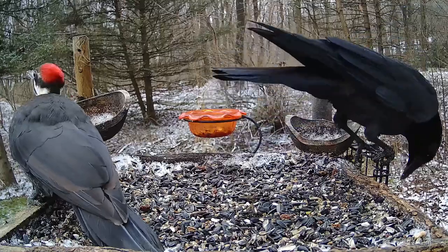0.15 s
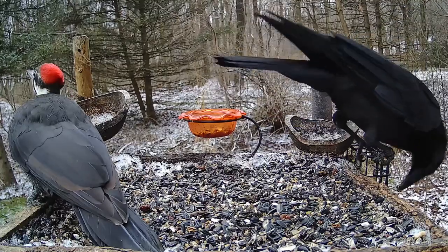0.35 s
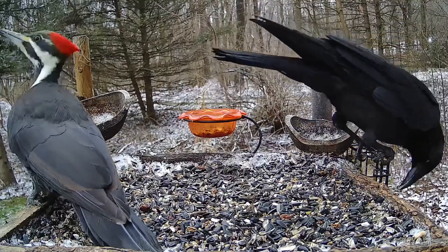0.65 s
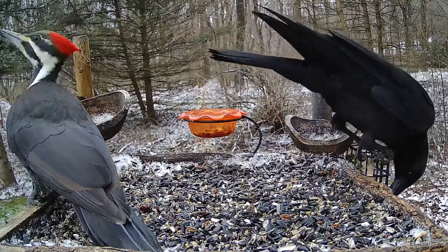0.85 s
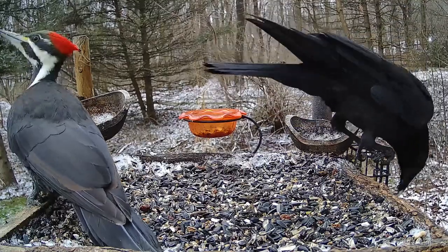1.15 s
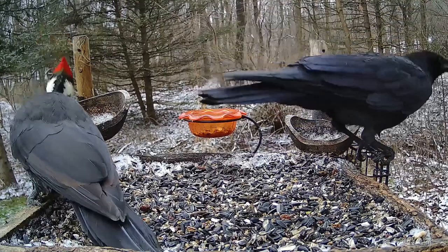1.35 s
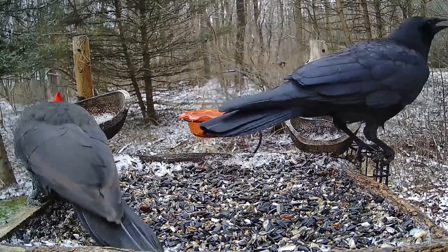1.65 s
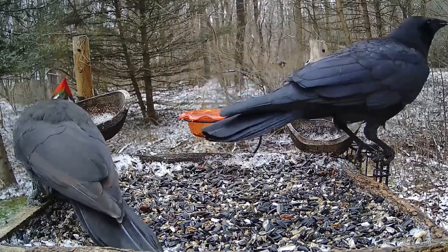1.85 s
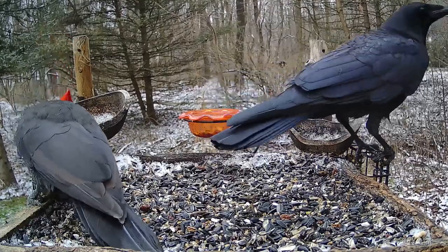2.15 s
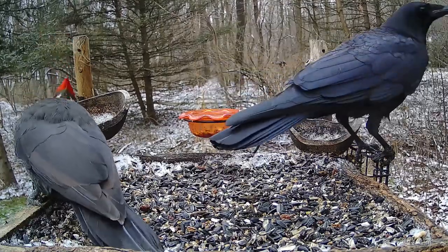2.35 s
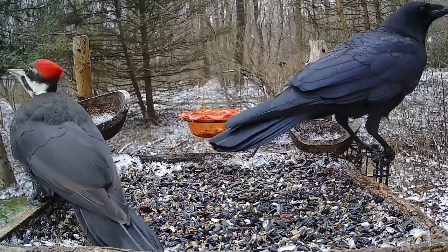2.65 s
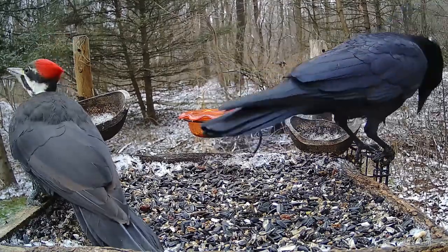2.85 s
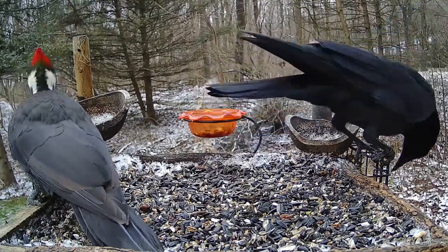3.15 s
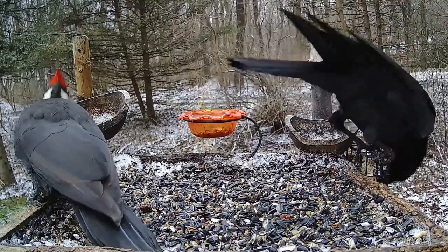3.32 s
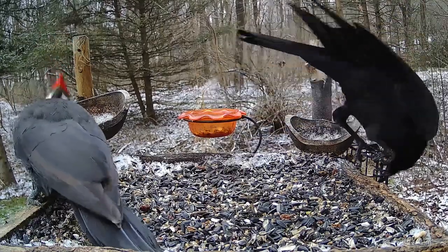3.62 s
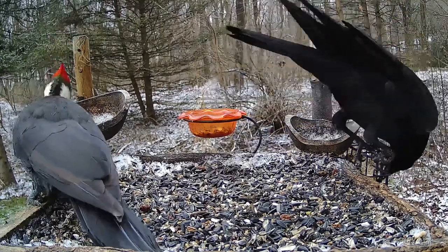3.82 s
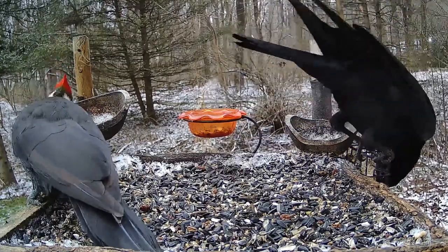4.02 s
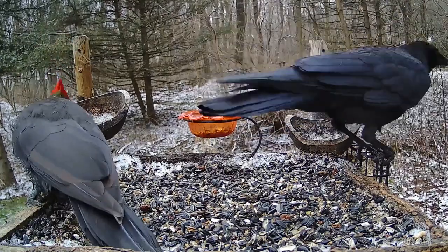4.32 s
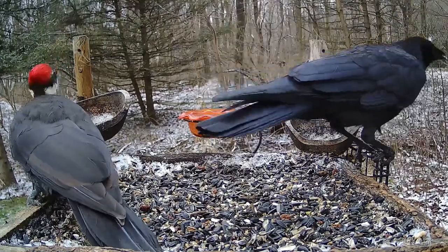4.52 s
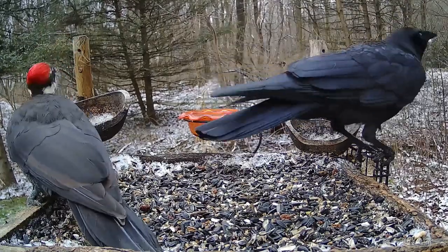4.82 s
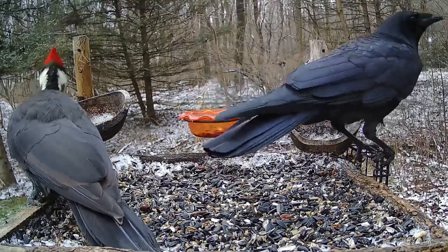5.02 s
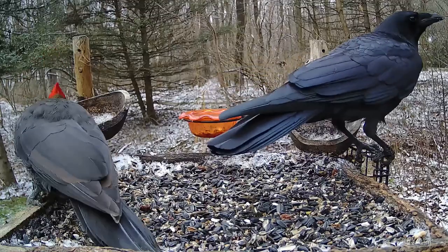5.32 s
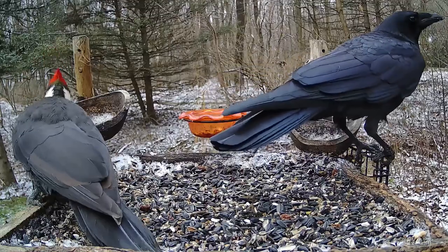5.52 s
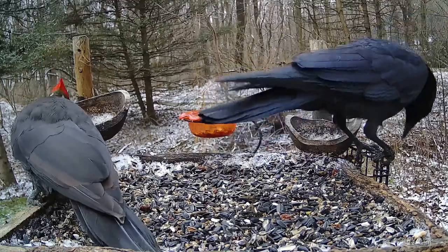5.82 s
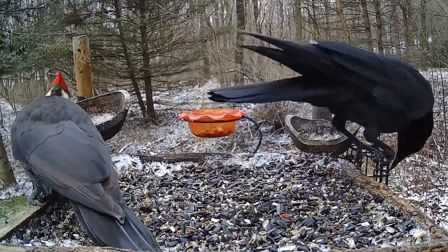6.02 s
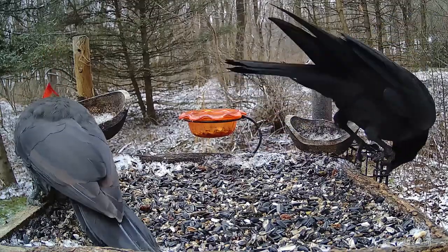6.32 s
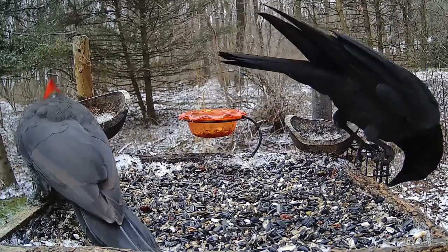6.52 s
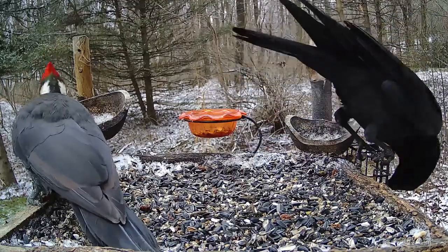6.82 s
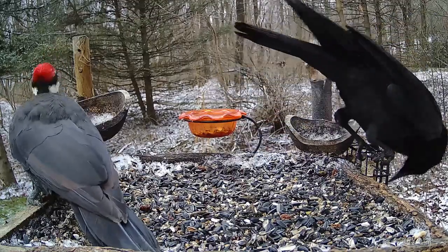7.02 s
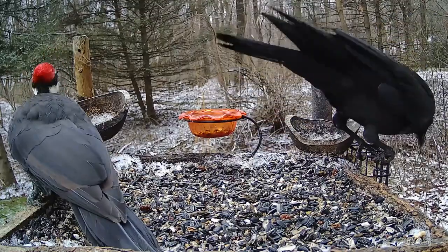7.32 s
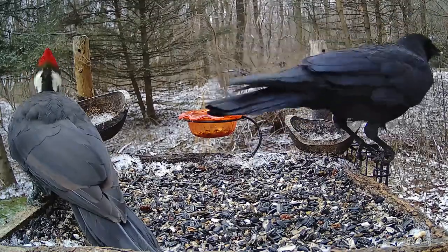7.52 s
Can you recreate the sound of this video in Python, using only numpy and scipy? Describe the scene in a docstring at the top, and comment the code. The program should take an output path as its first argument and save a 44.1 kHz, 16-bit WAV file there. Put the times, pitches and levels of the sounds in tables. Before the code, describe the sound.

A crow pecks at seed on a wooden feeder tray close to the microphone. Each peck gives a short crunch and a hollow thump, and harder ones rattle the feeder in quick clusters of dry clacks, with the tick of a splitting husk. The busiest cluster comes near the middle, then the pecks thin out. Behind are quiet winter woods, a soft low rush of air, faint high chirps and slight hiss.

```python
"""Quiet winter woods, the camera's microphone close to a wooden feeder tray where a crow pecks at seed.
Each peck stirs the seed and thumps the tray; hard ones set the feeder rattling in quick clusters of
clacks, jolt loose seeds and now and then split a husk. The trees return a faint echo.
Behind it: a soft outdoor rush, faint high bird calls far off and the camera's own hiss."""
import sys
import numpy as np
from scipy import signal
from scipy.fft import rfft, irfft, next_fast_len
from scipy.io import wavfile
from scipy.ndimage import map_coordinates

SR = 44100
rng = np.random.default_rng(int(sys.argv[2]) if len(sys.argv) > 2 else 0)


def store_pcm(level_fs):
    """Save levels as 16-bit WAV."""
    pcm = np.round(np.clip(level_fs, -1, 1) * 32767).astype(np.int16)
    wavfile.write(sys.argv[1], SR, np.atleast_2d(pcm).T)


N = 337806


def amp(db):
    """Decibels to gain."""
    return 10 ** (np.asarray(db) / 20)


def unit(x):
    """Scale to rms 1."""
    return x / np.sqrt(np.mean(x ** 2) + 1e-20)


def along(points, hz):
    """Read (f/Hz, value) points on a log frequency axis."""
    f, values = np.transpose(points)
    return np.interp(np.log(hz + 1), np.log(f + 1), values)


def add(track, s, sound):
    """Mix a sound into the track at s seconds."""
    part = track[max(round(s * SR), 0):][:len(sound)]
    part += sound[:len(part)]


def noise(spectrum, size):
    """Coloured noise of rms 1."""
    m = next_fast_len(size)
    colour = amp(along(spectrum, np.fft.rfftfreq(m, 1 / SR)))
    return unit(irfft(rfft(rng.standard_normal(m)) * colour, m)[:size])


def wobble(rate, size):
    """A smooth random curve, rate knots a second."""
    knots = rng.standard_normal(int(size * rate / SR) + 4)
    return map_coordinates(knots, [np.arange(size) * rate / SR])


def rise(t, tau):
    """Onset with a time constant of tau seconds."""
    return 1 - np.exp(-t / tau)


def fade(t, t60):
    """Exponential decay by 60 dB in t60 seconds."""
    return np.exp(-np.log(1000) * t / t60)


def ring(modes, t, scatter_db, detune, tilt_db=0):
    """Damped modes, a little different at every blow; the tilt is in dB per octave about their middle."""
    hz, db, t60 = np.transpose(modes)
    chance = rng.standard_normal((2, len(hz)))
    gain = amp(db + scatter_db * chance[0] + tilt_db * np.log2(hz / np.median(hz)))
    gain *= (-1) ** np.arange(len(hz))  # neighbouring modes swing in opposite senses
    pitch = hz * (1 + detune * chance[1])
    return gain @ (np.sin(2 * np.pi * np.outer(pitch, t)) * fade(t, t60[:, None]))


# Open air all around the microphone: f/Hz, relative density/dB
AIR_SPECTRUM = [(12, -48.5), (20, 6.5), (43, -5), (92, -11.5), (191, -21.5), (280, -18), (327, -23.5),
                (367, -21.5), (462, -20), (572, -17.5), (809, -33.5), (999, -34), (1440, -28), (1620, -42),
                (2000, -50.5), (2600, -109), (4400, -120)]
def outdoor_rush():
    """A low, almost steady rush of air."""
    return amp(-52.5 + 0.18 * wobble(2.42, N)) * noise(AIR_SPECTRUM, N)


# Hiss in the camera itself: f/Hz, relative density/dB
HISS_SPECTRUM = [(1120, 0.5), (1900, 0.5), (3280, -3.5), (5310, -4), (5600, -4), (7030, -3), (10300, -2),
                 (11400, -3), (12100, -2.5), (14400, -3.5), (15500, -9)]
# Its whine: f/Hz, rms level/dB
WHINE_TONES = [(9000, -96), (12000, -89)]
def camera_noise():
    """The electronics add a steady hiss and a thin whine."""
    t = np.arange(N) / SR
    whine = sum(amp(db) * np.sqrt(2) * np.sin(2 * np.pi * hz * t) for hz, db in WHINE_TONES)
    return amp(-71.5) * noise(HISS_SPECTRUM, N) + whine


def bird_whistle(s, length, db, hz, spacing_hz, sag_hz_per_s):
    """One thin, slowly falling call far off, three wavering partials wide."""
    out, t = np.zeros(N), np.arange(SR // 2) / SR
    swell = np.sin(np.pi * np.minimum(t / length, 1))
    for k in range(3):
        pitch = hz + k * spacing_hz - sag_hz_per_s * t + 35 * wobble(200, len(t))
        add(out, s, amp(db) * swell * np.sin(2 * np.pi * np.cumsum(pitch) / SR))
    return out


# A small bird far off in the woods: t/s
CHIRP_TIMES = [0.715, 1.98, 2.12, 2.652, 3.994, 4.42, 6.742, 7.523]
def bird_chirps(db, hz, spread_hz, width_s):
    """Tiny high notes, each bent a little differently."""
    out, t = np.zeros(N), np.arange(-SR // 40, SR // 40) / SR
    swell = np.exp(-(t / width_s) ** 2)
    for s in CHIRP_TIMES:
        pitch = hz + spread_hz * wobble(205, len(t))
        add(out, s + t[0], amp(db) * swell * np.sin(2 * np.pi * np.cumsum(pitch) / SR))
    return out


# Echo among the trees around the feeder: f/Hz, t60/s
ECHO_DECAY = [(200, 1), (1500, 0.64), (3500, 0.27), (10000, 0.77)]
def tree_echo(x):
    """The trees scatter back a diffuse tail."""
    hz, t, bands = signal.stft(rng.standard_normal(SR // 2), SR, nperseg=256)
    bands *= fade(t, along(ECHO_DECAY, hz)[:, None])
    _, tail = signal.istft(bands, SR, nperseg=256)
    return signal.fftconvolve(x, tail / np.linalg.norm(tail))[:N]


def feeder_sway(s, db, hz, t60):
    """The feeder rocks once, very low, as the bird straightens up."""
    out, t = np.zeros(N), np.arange(SR // 3) / SR
    add(out, s, amp(db) * np.sin(2 * np.pi * hz * t) * rise(t, 0.011) * fade(t, t60))
    return out


# Husks splitting near the microphone: t/s, level/dB
HUSK_SPLITS = [(1.321, -39), (3.276, -40), (3.2882, -30), (3.316, -35.5), (3.522, -41), (3.536, -41),
               (4.774, -39), (6.3725, -40), (6.69, -41.5)]
# One snap: f/Hz, relative density/dB
SNAP_SPECTRUM = [(3000, -8), (5500, -2), (8000, -4), (10500, -8), (15000, -13)]
def husk_snaps():
    """Splitting husks tick high above the wooden sounds."""
    out, t = np.zeros(N), np.arange(SR // 20) / SR
    for s, db in HUSK_SPLITS:
        add(out, s, amp(db) * noise(SNAP_SPECTRUM, len(t)) * rise(t, 0.0017) * fade(t, 0.0095))
    return out


# Taps on bare parts of the feeder, close up: t/s, level/dB, f/Hz
BARE_TAPS = [(0.055, -37.5, 1040), (0.066, -45.5, 3320), (0.384, -41, 1113), (0.721, -29, 171),
             (1.692, -56, 2880), (2.019, -55, 3030), (2.742, -63.5, 3180), (3.815, -60, 2920),
             (6.374, -44, 1510), (6.376, -48, 2160), (6.379, -41.5, 1093), (6.697, -32, 173)]
def knocks():
    """Each spot gives a short hollow ring at its own pitch, with a weaker partial above it."""
    out, t = np.zeros(N), np.arange(SR // 6) / SR
    for s, db, hz in BARE_TAPS:
        t60 = 0.05 * (hz / 1000) ** -0.45  # low spots ring longer
        modes = [(hz, 0, t60), (1.33 * hz, -8, 0.31 * t60)]
        add(out, s, amp(db) * ring(modes, t, scatter_db=1.5, detune=0.002) * rise(t, 0.001))
    return out


# The feeder's rattling parts: f/Hz, relative level/dB, t60/s
RATTLE_MODES = [(575, -4, 0.017), (983, -20.5, 0.06), (1058, -4.5, 0.033), (1218, -9, 0.031),
                (1289, 1, 0.024), (1406, -6.5, 0.023), (1569, -7, 0.026), (1850, -14, 0.03),
                (2050, -10.5, 0.015), (2410, -13.5, 0.024), (2600, -29.5, 0.03), (2800, -43, 0.038),
                (3093, -1.5, 0.0089), (3210, -4, 0.019), (3430, -17.5, 0.0091), (3600, -12, 0.027)]
# The crack as they meet: f/Hz, relative density/dB
CRACK_SPECTRUM = [(150, -10), (400, 12), (780, -12), (1200, 5.5), (1750, -10), (2400, -2.5), (2850, -5.5),
                  (3400, -5.5), (3750, -29), (4300, -25), (5600, -26), (9000, -31), (14500, -53)]
# Their contacts, loud at the microphone: t/s, level/dB, brightness/dB
CONTACTS = [(0.067, -41.5, 4.5), (0.385, -45, -9), (0.739, -33.5, -6.5), (1.119, -43, 4.5),
            (1.1351, -27.5, -5), (1.3189, -26.5, 6.5), (1.3412, -27.5, 2), (1.3547, -23.5, -1),
            (1.377, -46.5, -16), (3.0139, -36.5, -3.5), (3.0264, -40, -7), (3.049, -31, -7),
            (3.2751, -28, 4), (3.292, -34, -2), (3.297, -24, 5), (3.316, -21.5, -1.5), (3.331, -30.5, -3.5),
            (3.3568, -27.5, -3.5), (3.3653, -33.5, 7), (3.5217, -25, 1), (3.5443, -35, 13.5),
            (3.5605, -22.5, -1), (3.588, -45.5, 11), (3.6445, -28, -1), (4.7749, -28.5, 8),
            (4.796, -37.5, 13), (4.8102, -24.5, -5.5), (6.377, -38, -4.5), (6.695, -40, -7.5),
            (7.385, -55.5, -7)]
def clacks():
    """Each contact is a dry crack and a brief ring over a dull shove; a weaker rebound follows."""
    out, t = np.zeros(N), np.arange(SR // 8) / SR
    rebounds = [(s + 0.010 * np.exp(0.3 * rng.standard_normal()), db - 10.5, bright_db + 1)
                for s, db, bright_db in CONTACTS]
    shove_s = 0.0012
    shove = -amp(6) * t / shove_s * np.exp(-t / shove_s)
    for s, db, bright_db in CONTACTS + rebounds:
        tone = amp(-4) * ring(RATTLE_MODES, t, scatter_db=1.8, detune=0.003, tilt_db=bright_db)
        crack = amp(bright_db) * noise(CRACK_SPECTRUM, len(t)) * fade(t, 0.017)
        add(out, s, amp(db) * ((tone + crack) * rise(t, 0.001) + shove))
    return out


def loose_seeds(gain_db, span_s, count):
    """Each of those contacts jolts a few seeds, which drop back with tiny ticks."""
    out, t = np.zeros(N), np.arange(SR // 80) / SR
    for s, clack_db, _ in CONTACTS:
        for wait, softness, pitch in rng.uniform(size=(count, 3)):
            hz = 1300 + 1900 * pitch
            tick = np.sin(2 * np.pi * hz * t) * rise(t, 0.00033) * fade(t, 0.004)
            add(out, s + span_s * wait, amp(clack_db + gain_db - 6.7 * softness) * tick)
    return out


# The whole tray swaying on its mount: f/Hz, relative level/dB, t60/s
TRAY_MODES = [(46.7, 1, 0.18), (54, 3.5, 0.13), (67.1, -2.5, 0.51), (78.2, -16.5, 0.62),
              (95.5, -11.5, 0.86), (122.8, -13.5, 0.4), (163, -15, 0.42), (196.3, -12.5, 0.41)]
# Its boards, damped by the seed: f/Hz, relative level/dB, t60/s
BOARD_MODES = [(238, -7, 0.077), (257.4, -10, 0.18), (372.4, -0.5, 0.13), (428, -2, 0.068),
               (509, -12, 0.12), (560, -5.5, 0.1), (614, -7.5, 0.078)]
# A thin panel, whose close pair of modes swells and beats out: f/Hz, relative level/dB, t60/s
PANEL_MODES = [(322.9, 6.5, 0.089), (336.2, 5, .17)]
# Seed crunching around the bill: f/Hz, relative density/dB
CRUNCH_SPECTRUM = [(200, -35), (500, 17), (780, 8.5), (1200, 11), (1800, -3), (2500, -2), (3300, -7),
                   (4300, -15.5), (5800, -19), (9000, -16), (15000, -55)]
# The crow, close to the microphone; hard blows reach the wood, soft ones stay in the seed:
# t/s, force/dB, hardness/dB
BILL_BLOWS = [(0.056, -28, 5.5), (0.378, -28.5, 9.5), (0.721, -26.5, -4.5), (1.111, -25.5, -2.5),
              (1.321, -21.5, 4.5), (1.696, -41, 5), (1.814, -61.5, 27), (2.016, -51.5, 6),
              (3.012, -23, 4.5), (3.278, -17, -4), (3.317, -16.5, -2), (3.522, -23, 4.5), (3.633, -21, -6),
              (3.795, -41, 2), (4.777, -24, -2), (4.815, -26, -4), (4.836, -38, -10), (5.246, -58, 14.5),
              (5.831, -43.5, -7.5), (6.215, -33.5, -10.5), (6.379, -33, 5), (6.696, -30.5, 2)]
def pecks():
    """The bill ploughs through the seed, pushes the tray, knocks its boards and rings the panel."""
    out, t = np.zeros(N), np.arange(SR // 2) / SR
    short = t[:SR // 5]
    push = short * np.exp(-short / 0.00072)  # the seed cushions the blow
    stroke = (1 - np.exp(-(short / 0.011) ** 2)) * fade(short, 0.14)
    lead_s = 0.011  # the bill meets the seed before the tray
    for s, force_db, hard_db in BILL_BLOWS:
        force = amp(force_db)
        # sliding seed damps the ringing in proportion to the force
        tray_db_per_s, panel_db_per_s = 356 * force, 1994 * force
        thump = ring(TRAY_MODES, t, scatter_db=1.5, detune=0.0088) * amp(-tray_db_per_s * t)
        add(out, s, force * signal.fftconvolve(thump, push / push.sum()))
        board = ring(BOARD_MODES, short, scatter_db=1.5, detune=0.015) * rise(short, 0.0037)
        add(out, s, force * amp(-12.5 + 0.73 * hard_db) * board)
        panel = ring(PANEL_MODES, short, scatter_db=0.3, detune=0.002) * amp(-panel_db_per_s * short)
        add(out, s, force * amp(-10.5 + hard_db) * panel)
        crunch = unit(noise(CRUNCH_SPECTRUM, len(short)) * amp(2.1 * wobble(397, len(short))))
        add(out, s - lead_s, force * amp(-16.5 + 0.22 * hard_db) * stroke * crunch)
    return out


def scene():
    """One microphone: the feeder up close, the woods behind."""
    seeds = loose_seeds(gain_db=-10, span_s=0.013, count=4)
    seeds += loose_seeds(gain_db=-24.5, span_s=0.11, count=5)
    feeder = pecks() + clacks() + knocks() + husk_snaps() + seeds
    sway = feeder_sway(s=1.570, db=-24.5, hz=20.4, t60=0.31)
    birds = bird_chirps(db=-68, hz=5690, spread_hz=94, width_s=0.005)
    birds += bird_whistle(s=0.86, length=0.27, db=-85, hz=5830, spacing_hz=750, sag_hz_per_s=600)
    echo = amp(-21.5) * tree_echo(feeder)
    return (outdoor_rush() + camera_noise() + birds + echo + sway + feeder)[None]


def record(dry):
    """The camera cuts off steeply above its band limit."""
    limit_hz = 15600
    m = next_fast_len(N + SR // 2)
    lowpass = 1 / (1 + (np.fft.rfftfreq(m, 1 / SR) / limit_hz) ** 120)
    return irfft(rfft(dry, m) * lowpass, m)[..., :N]


dry = scene()
out = record(dry)
store_pcm(out)
```